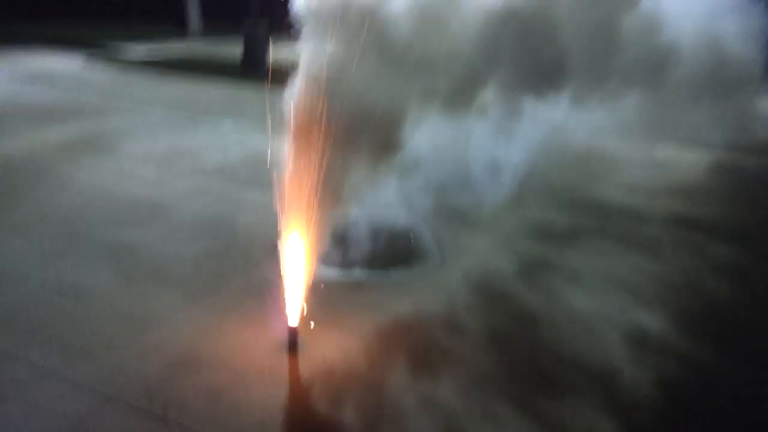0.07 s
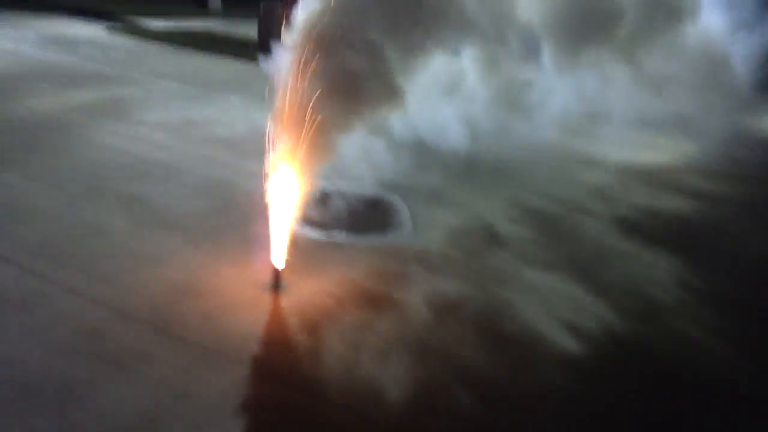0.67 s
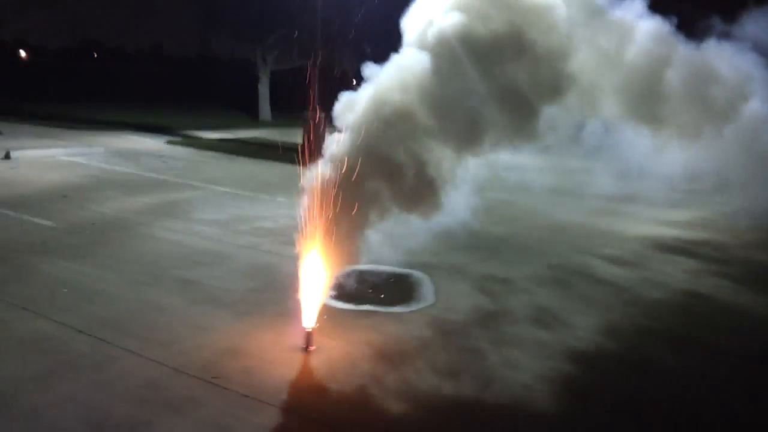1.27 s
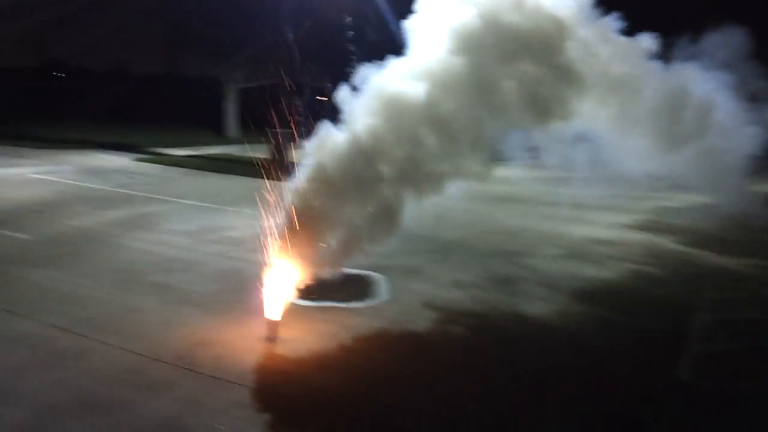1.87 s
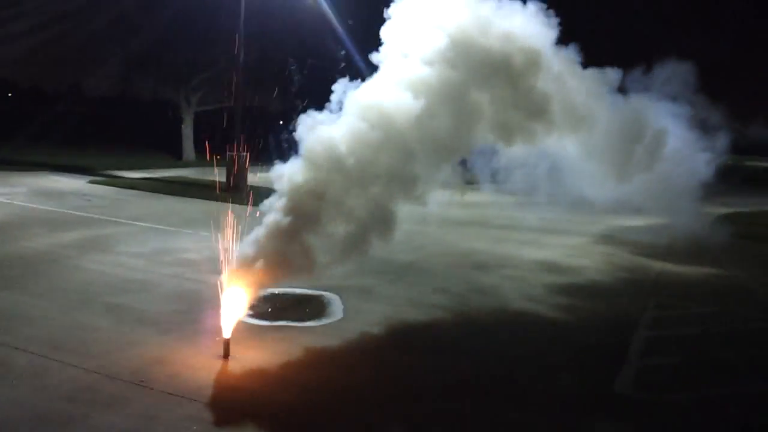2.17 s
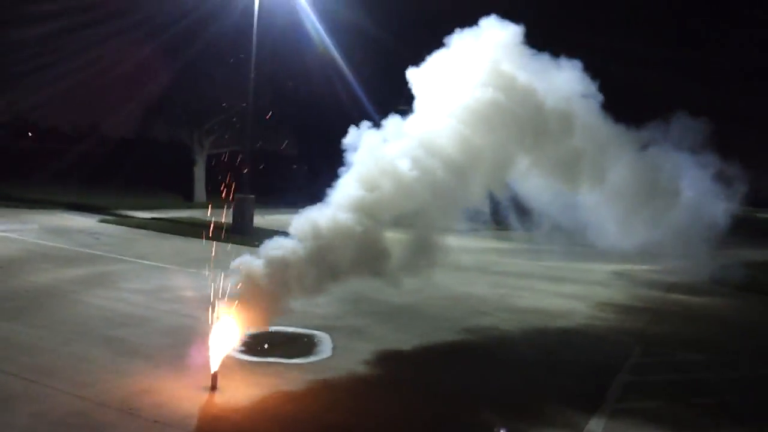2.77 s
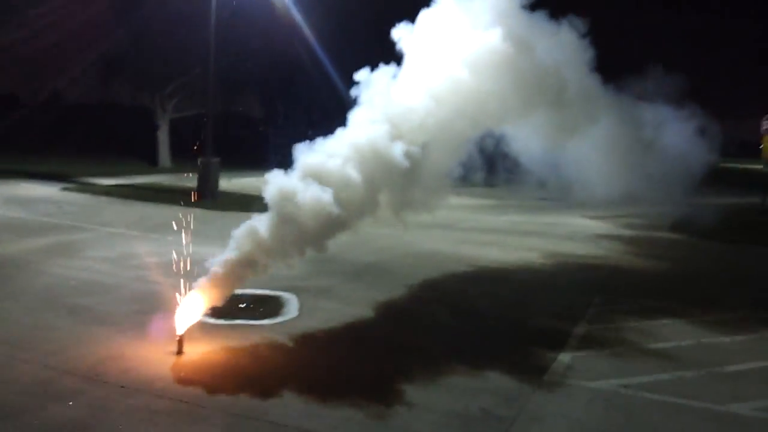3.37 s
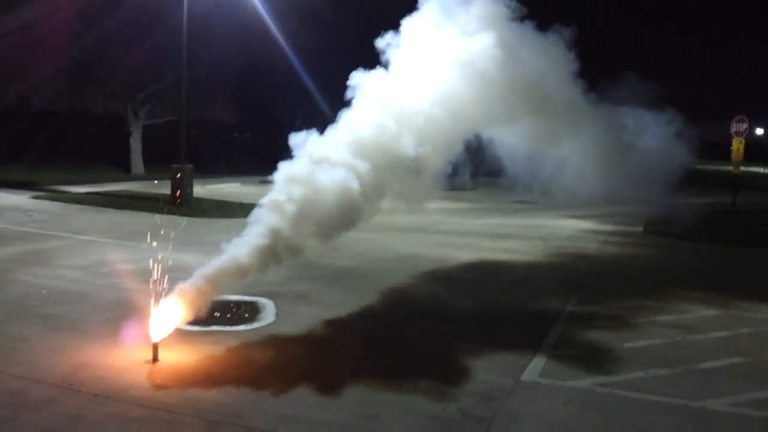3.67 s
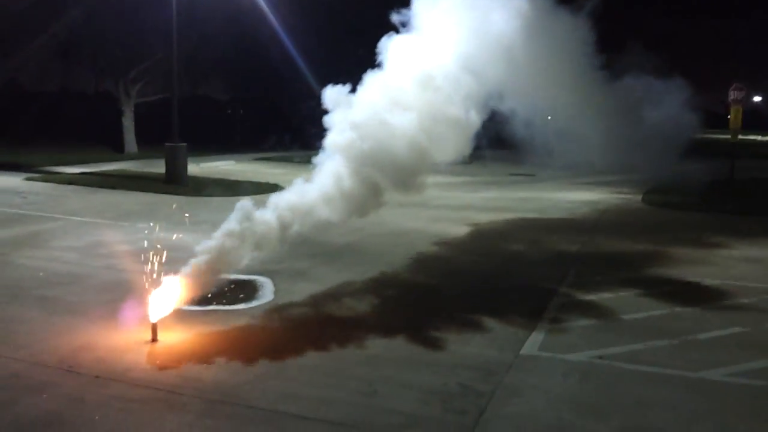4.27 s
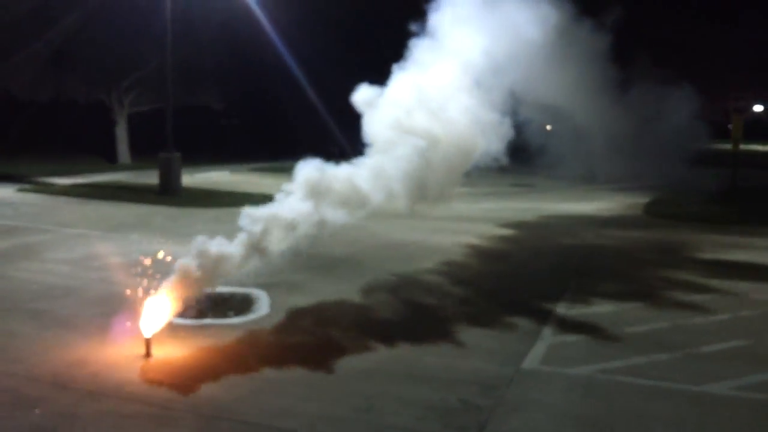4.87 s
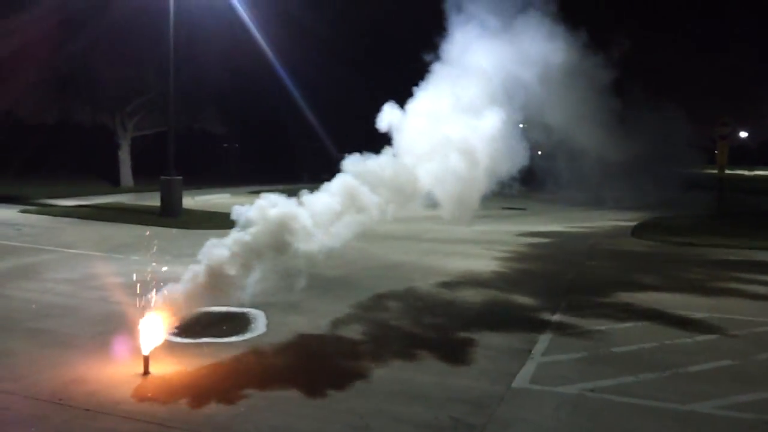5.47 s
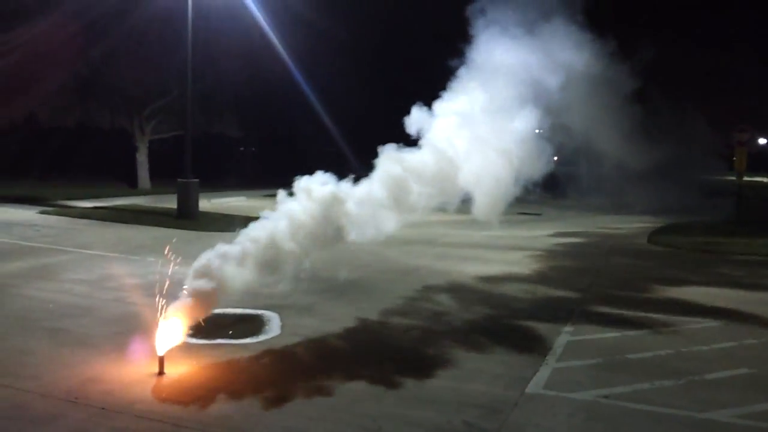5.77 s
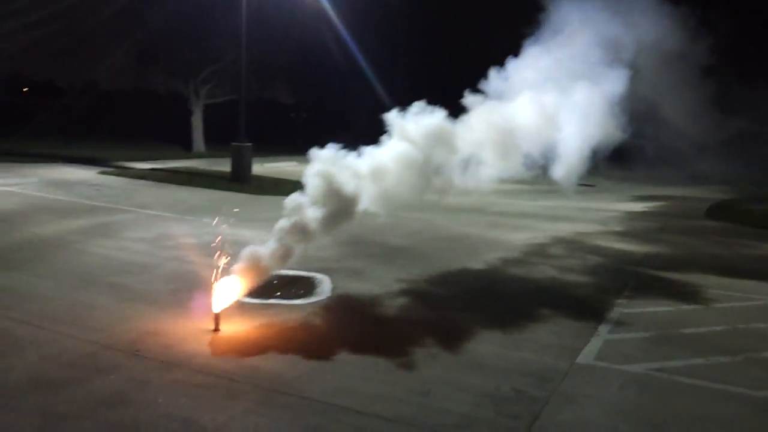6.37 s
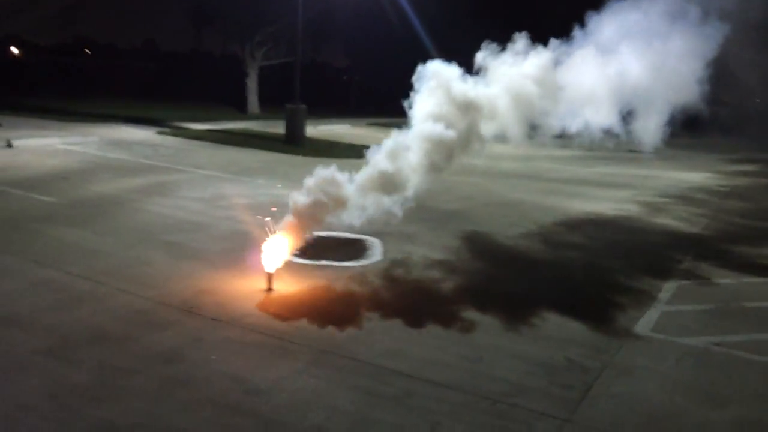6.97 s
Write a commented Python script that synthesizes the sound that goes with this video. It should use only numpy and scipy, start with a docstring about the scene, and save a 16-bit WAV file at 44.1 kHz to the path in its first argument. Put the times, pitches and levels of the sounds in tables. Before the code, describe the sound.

A homemade smoke tube roars and hisses outdoors, then fades to a sizzle with faint crackles while wind gusts buffet the microphone.

```python
"""A concrete lot at night: a homemade smoke tube burns upright, a few metres from a hand-held phone.
Its turbulent jet roars and hisses, then sinks to a sizzle in which the emptying tube resonates and
sparks crackle. Bounces off concrete, fingers and hand comb the hiss as the phone moves.
Wind gusts buffet the two microphone ports and overload the right one."""
import sys
import numpy as np
from scipy import signal
from scipy.fft import rfft, irfft
from scipy.io import wavfile
from scipy.ndimage import uniform_filter1d

SR = 44100
rng = np.random.default_rng(int(sys.argv[2]) if len(sys.argv) > 2 else 0)


def dump(signal):
    """Clip the signal to [-1, 1] and save it as 16-bit WAV at the path in sys.argv[1]."""
    limited = np.clip(np.atleast_2d(signal).T, -1, 1)
    pcm = np.round(limited * 32767).astype(np.int16)
    wavfile.write(sys.argv[1], SR, pcm)


N = 318843
TIME = np.arange(N) / SR
HZ = np.maximum(np.arange(N // 2 + 1) * SR / N, 1)
FULL_THRUST_DB = -15

# course of the burn: time_s, thrust_db, hiss_tilt_db_per_octave
BURN = [(0, -13, -0.5), (.35, -13, -2.5), (1.2, -14.5, -2.3), (1.6, -16.5, -1), (2.05, -20.5, -2.5),
        (2.6, -23.5, -2), (3.2, -28.5, -1.9), (3.8, -30.5, 0.3), (5.3, -46, -0.9), (7.23, -37.5, -1)]


def from_db(db):
    """Decibels to gain."""
    return 10 ** (np.asarray(db) / 20)


def unit_rms(x):
    """Scale to rms 1."""
    return x / np.sqrt(np.mean(x ** 2) + 1e-20)


def in_time(rows, at_s=TIME):
    """Value columns of a table, interpolated over time."""
    time_s, *columns = np.transpose(rows)
    return [np.interp(at_s, time_s, column) for column in columns]


def over_hz(points):
    """A curve interpolated over log frequency."""
    hz, value = np.transpose(points)
    return np.interp(np.log(HZ), np.log(hz), value)


def coloured(spectrum):
    """Noise of the given spectrum, rms 1."""
    return unit_rms(irfft(rfft(rng.standard_normal(N)) * from_db(over_hz(spectrum)), N))


def drift(rate_hz):
    """Slow random wander, rms 1."""
    return unit_rms(irfft(rfft(rng.standard_normal(N)) / (1 + (HZ / rate_hz) ** 2), N))


def moving_filter(x, gain, size=1024):
    """Filter by a slowly changing gain(hz, s)."""
    hz, s, frames = signal.stft(x, SR, nperseg=size)
    return signal.istft(frames * gain(hz[:, None], s), SR, nperseg=size)[1][..., :N]


def roar(thrust_db, flutter_db=1.55):
    """Large jet eddies: low, unsteady, alike at both ports."""
    # freq_hz, density_db
    spectrum = [(20, -3.5), (60, 1.5), (110, 2), (230, 1), (310, -4.5), (435, -19.5), (600, -11),
                (800, -10), (1100, -22.5), (1400, -28), (2200, -21.5), (3200, -47.5), (6000, -37.5)]
    return from_db(thrust_db + flutter_db * drift(15)) * coloured(spectrum)


def rush(thrust_db, level_db=-24.0, steepness=1.9, stereo_spread=0.32):
    """Small, fast eddies at full thrust; they fade sooner than the roar."""
    # freq_hz, density_db
    spectrum = [(400, -46), (850, 10), (1100, 7.5), (1450, 5), (2000, 7), (2800, -4), (3400, -15),
                (5300, 6), (6400, -14.5), (7500, -10.5), (9500, -8.5), (11600, -7.5), (13000, -10),
                (15000, -34)]
    eddies = coloured(spectrum) + stereo_spread * coloured(spectrum) * np.array([[1], [-1]])
    return from_db(level_db + steepness * (thrust_db - FULL_THRUST_DB)) * unit_rms(eddies)


def sizzle(grains_per_s=900, spread_db=3.5, grain_share=0.37):
    """Rushing gas plus the ticks of tiny burning grains."""
    sizes = from_db(spread_db * np.minimum(rng.exponential(1, N), 4)) * rng.choice([-1, 1], N)
    gas = rng.standard_normal(N)
    ticks = sizes * (rng.random(N) < grains_per_s / SR)
    return gas + grain_share * unit_rms(ticks)


def hiss_gain(thrust_db, steepness=1.75, flare_decay_s=0.23, fade_db_per_s=0.66):
    """Power sum of the jet, its opening flare and the slowly weakening burning face."""
    jet = from_db(-26.5 + steepness * (thrust_db - FULL_THRUST_DB))
    flare = from_db(-21.5) * np.exp(-TIME / flare_decay_s)
    face = from_db(-31 - fade_db_per_s * TIME)
    return np.sqrt(jet ** 2 + flare ** 2 + face ** 2)


def hiss(thrust_db, sputter_db=0.5, surge_db=0.62, pivot_hz=5000, port_lag_s=0.000326):
    """Fine turbulence at the mouth; its treble reaches the right port later and partly changed."""
    # freq_hz, density_db
    spectrum = [(300, -2.5), (650, 8), (1100, -3), (1700, -6.5), (2300, 1.5), (3500, 0.5), (5200, 9),
                (6400, -2), (8000, -2.5), (10000, 3), (12000, -3.5), (13200, -0.5), (14500, -13)]
    # likeness of the two ports: freq_hz, correlation
    likeness = [(600, .95), (1400, .85), (3000, .8), (7000, .78), (14000, .55)]

    def tilt(hz, s):
        _, db_per_octave = in_time(BURN, s)
        return from_db(db_per_octave * np.log2(np.maximum(hz, 1000) / pivot_hz))

    left, unrelated = rfft(sizzle()), rfft(sizzle())
    correlation = over_hz(likeness)
    treble_lag = np.exp(-2j * np.pi * HZ * port_lag_s * (HZ > 3200))
    right = correlation * left * treble_lag + np.sqrt(1 - correlation ** 2) * unrelated
    pair = unit_rms(irfft(np.array([left, right]) * from_db(over_hz(spectrum)), N))
    flicker = from_db(sputter_db * drift(59) + surge_db * drift(12))
    return moving_filter(pair, tilt) * hiss_gain(thrust_db) * flicker


def tube(stereo_spread=0.24, waver=0.0097, core_db=6.5, core_width_hz=38, skirt_ratio=0.93):
    """Flow excites the open tube's quarter-wave modes; their pitch wavers with the heat."""
    # air column above the burning face: time_s, pitch_hz, level_db, upper_lift_db
    air_column = [(0, 815, -25.5, -8), (1.5, 840, -41, 19), (2.3, 895, -33.5, 8), (3.3, 916, -31, 4.5),
                  (4.5, 900, -31, 0), (5.7, 890, -31.5, -1.5), (6.3, 857, -31.5, -0.5), (6.7, 884, -34, 10),
                  (7.23, 888, -36, 10)]
    # lowest and upper mode: pitch_ratio, width_hz, level_db
    odd_modes = [(1, 180, 3), (3.13, 393, -12.5)]
    heat = 1 + waver * drift(5)

    def resonance(hz, s):
        pitch_hz, _, lift_db = in_time(air_column, s)
        pitch_hz = pitch_hz * np.interp(s, TIME, heat)
        # lowest mode: a sharp core on a broad skirt that leans low
        core = from_db(core_db) / (1 + ((hz - pitch_hz) / core_width_hz) ** 2)
        skirt, upper = [from_db(db) / (1 + ((hz - ratio * pitch_hz * lean) / width_hz) ** 2) ** 2
                        for (ratio, width_hz, db), lean in zip(odd_modes, (skirt_ratio, 1))]
        return core + skirt + from_db(lift_db) * upper

    flow = rng.standard_normal(N) + stereo_spread * rng.standard_normal((2, N))
    _, level_db, _ = in_time(air_column)
    return from_db(level_db) * unit_rms(moving_filter(flow, resonance, size=4096))


def sparks(sputter_gain=0.29):
    """Larger sparks burst: a sharp snap, then milliseconds of sputter."""
    # start_s, peak_db, centre_hz, decay_s, width_octaves
    bursts = [(3.6333, -15.5, 2080, 0.0012, 0.61), (3.909, -15, 7000, 0.0018, 1.2),
              (4.2342, -6, 11500, 0.0012, 1.7), (4.2588, -16, 9000, .0007, 1.4),
              (4.37, -17, 8000, .001, 1.3), (4.788, -19, 8700, 0.0033, 1.2),
              (5.938, -12.5, 12500, 0.0013, 1.5)]
    out, age_s = np.zeros((2, N)), TIME[:SR // 20]
    snap = 2 * (age_s == 0)
    for start_s, peak_db, centre_hz, decay_s, width_octaves in bursts:
        edge_ratio = 2 ** (width_octaves / 2)
        edges_hz = [centre_hz / edge_ratio, min(centre_hz * edge_ratio, 18000)]
        band = signal.butter(2, edges_hz, "band", fs=SR, output="sos")
        sputter = sputter_gain * rng.standard_normal((2, len(age_s))) * np.exp(-age_s / decay_s)
        pop = signal.sosfilt(band, snap + sputter)
        pop /= np.abs(pop).max(axis=1, keepdims=True)
        start = round(start_s * SR)
        out[:, start:start + len(age_s)] += from_db(peak_db) * pop
    return out


def echo(x, path, port_shares, treble_slope, pivot_hz=5000):
    """One close bounce cuts evenly spaced notches that slide with its lag."""
    def comb(hz, s):
        lag_ms, strength = in_time(path, s)
        tilt = (np.maximum(hz, pivot_hz / 2) / pivot_hz) ** treble_slope
        strength = np.minimum(strength * np.array(port_shares)[:, None, None] * tilt, 1)
        bounce = np.exp(-2j * np.pi * hz * lag_ms / 1000)
        return (1 + strength * bounce) / np.sqrt(1 + strength ** 2)

    return moving_filter(x, comb)


def close_echoes(x):
    """Bounces off the concrete, the fingers on the phone's edge and the hand by the right port."""
    # echo paths: time_s, lag_ms, relative_strength
    concrete = [(0.0, 1.32, 0.13), (0.8, 1.17, 0.22), (1.4, 1.47, 0.04), (2.0, 1.74, 0.2),
                (2.8, 1.36, 0.33), (3.6, 1.4, 0.027), (4.2, 1.06, 0.12), (5.8, 0.74, 0), (6.4, 1.3, 0.2),
                (7.23, 1.7, 0.24)]  # lag follows the phone's height and distance
    fingers = [(0.0, 0.25, 0.13), (1.8, 0.3, 0.12), (2.6, 0.27, 0.4), (3.5, 0.25, 0.355), (5.7, 0.25, 0.24),
               (7.23, 0.23, 0.202)]
    hand = [(0.0, 0.71, 0.28), (1.5, 0.66, 0.45), (2.6, 0.71, 0.4), (3.3, 0.65, 0.7), (4.4, 0.636, 0.55),
            (6.2, 0.64, 0.3), (7.23, 0.72, 0.4)]
    x = echo(x, concrete, port_shares=(1.15, 1.2), treble_slope=-0.15, pivot_hz=4000)
    x = echo(x, fingers, port_shares=(1, 0.58), treble_slope=0.16)
    return echo(x, hand, port_shares=(0, 1), treble_slope=-0.44)


def sliding_bands(x):
    """Narrow peaks and dips that shift with each port's angle to the jet."""
    # band tracks: time_s, centre_hz, left_db, right_db
    null = [(0.0, 3120, -10.478, -3.5), (1.8, 2920, -10, 7), (2.7, 2964.51, -14, 0.527),
            (3.7, 3100, -9.333, -5), (4.4, 2958.71, -33, 1), (7.23, 2977.87, -19, -1.5)]
    lower_notch = [(0.0, 3200, -2.227, -9), (2.7, 3700, -3, 2), (3.3, 4133.13, -10, -2),
                   (4.6, 4086.81, -1.462, -6.351), (5.8, 3895.94, 2.651, -7), (6.5, 3930, 5.5, -4.367),
                   (7.23, 3130.4, -4.0, -2.891)]
    whistly_edge = [(0.0, 5466.7, 2, -4), (1.7, 5189.71, 0.5, 0), (2.7, 5000, 0.651, -2), (3.3, 5030, 3, 3),
                    (4.4, 4872.12, -1, 5), (5.8, 4830, -3, 1), (6.6, 4838.59, 3.5, 4), (6.9, 4200, 7.5, 6),
                    (7.23, 4126.89, 4, 3)]
    upper_notch = [(0.0, 6434.14, 5, 2.035), (1.5, 6360.69, -4, -12), (2.8, 5600, 1, -3),
                   (4.0, 5558.81, 2, 2), (5.0, 5400, -4, 3), (5.8, 5711.07, -7.851, 0),
                   (6.5, 5560, -6.583, 5), (7.23, 5240, -6, -6)]
    treble_hollow = [(0.0, 9900, -5, 3), (2.0, 9800, -10, 3), (2.7, 9886.18, -9.405, -5.056),
                     (3.5, 9823.69, -18, -6), (4.5, 9890.1, -18.697, -1.914), (5.6, 9900, -28, -14.377),
                     (6.3, 9760, -12, -6.472), (7.23, 9600, -9.481, 3.125)]
    # track, width_hz
    bands = [(null, 100), (lower_notch, 150), (whistly_edge, 220),
             (upper_notch, 150), (treble_hollow, 440)]

    def gain(hz, s):
        total_db = 0
        for track, width_hz in bands:
            centre_hz, *port_db = in_time(track, s)
            bell = np.exp(-((hz - centre_hz) / width_hz) ** 2)
            total_db = total_db + np.array(port_db)[:, None] * bell
        return from_db(total_db)

    return moving_filter(x, gain)


def port_colour(x):
    """Each microphone port has its own steady peaks and dips."""
    # centre_hz, width_hz, gain_db
    left_port = [(1380.37, 292, 8.5), (2030, 110, 3), (3070, 165, -15), (4360, 1990, 5.5),
                 (5600, 880, -2.5), (7700, 1400, 15.512), (11414.9, 1569.52, 9.5), (12882.3, 558.198, -1)]
    right_port = [(2700, 530, 4.5), (2031.43, 132.282, 2.3), (4600, 180, -9.5), (5960, 170, 2.3),
                  (6980, 500, 8), (9400, 284.493, -11), (11900, 390, 1), (1770.76, 88.569, -6.2),
                  (12800, 413.736, -13)]
    colour_db = [sum(db * np.exp(-((HZ - hz) / width_hz) ** 2) for hz, width_hz, db in port)
                 for port in (left_port, right_port)]
    return irfft(rfft(x) * from_db(colour_db), N)


def wind_strength(attack_s=0.02, release_s=0.033, calm_db=-29, breeze_start_s=2.51, breeze_rise_s=0.092):
    """Wind gain, left and right: gusts rise, hold and fall over a calm, later over a breeze."""
    # start_s, length_s, left_db, right_db
    gusts = [(0.16, 0.045, -31, -13.5), (0.323, 0.14, -23, -9), (0.935, 0.13, -19, -20),
             (1.302, 0.26, -20, -6), (1.618, 0.099, -30, -6), (1.946, 0.16, -22, -15.5),
             (2.647, 0.054, -30, -8), (2.733, 0.049, -30, -4.5), (2.822, 0.12, -16, -6),
             (3.064, 0.06, -16, -8), (3.175, 0.35, -26, -8), (3.606, 0.099, -21.5, -10),
             (3.802, 0.047, -17, -9), (3.95, 0.17, -19, -18), (4.15, 0.1, -23, -7),
             (4.339, 0.047, -11.5, -13), (4.44, 0.036, -25, -7), (4.522, 0.13, -21, -11.5),
             (4.695, 0.042, -23, -9.5), (4.867, 0.092, -16, -10.5), (4.958, 0.075, -16, -10),
             (5.092, 0.05, -16, -11.5), (5.22, 0.094, -23, -7.5), (5.381, 0.13, -21, -10),
             (5.558, 0.058, -29, -5), (5.646, 0.037, -28, -4.5), (5.709, 0.088, -32, -4),
             (5.854, 0.09, -29, -8), (5.987, 0.067, -27, -9), (6.159, 0.2, -36, -9),
             (6.422, 0.055, -24, -12), (6.512, 0.12, -37, -5.5), (6.836, .05, -32, -15),
             (6.933, 0.09, -38, -9.5), (7.055, 0.042, -36, -13), (7.202, 0.097, -29, -5.5)]
    breeze = from_db([[-24.5], [-15]]) * np.clip((TIME - breeze_start_s) / breeze_rise_s, 0, 1)
    power = from_db(calm_db) ** 2 + breeze ** 2
    for start_s, length_s, left_db, right_db in gusts:
        rise = (TIME - start_s) / attack_s
        fall = 1 - (TIME - start_s - length_s) / release_s
        envelope = np.clip(np.minimum(rise, fall), 0, 1)
        power += (from_db([[left_db], [right_db]]) * envelope) ** 2
    return np.sqrt(power)


def wind(strength, puff_db=6.5, shed_db=-17):
    """Lumpy pressure at one port; its strongest swings shed small, brighter eddies."""
    # freq_hz, density_db
    lump_spectrum = [(10, -19), (28, 0), (70, 0), (110, -5.5), (170, -12), (280, -21.5), (500, -40),
                     (1000, -47), (3000, -56.5)]
    eddy_spectrum = [(40, -40), (130, 24), (300, -5), (550, -8), (1000, -45), (1600, -36), (3000, -55)]
    lumps = coloured(lump_spectrum) * from_db(puff_db * drift(12.5))
    local_rms = np.sqrt(uniform_filter1d(lumps ** 2, size=3000))
    pressure = lumps / local_rms * strength
    swing_power = uniform_filter1d(pressure ** 2, size=300)
    return pressure + from_db(shed_db) * swing_power * coloured(eddy_spectrum)


def buffets(slap_gain=0.85, low_hz=105, typical_top_hz=620, typical_decay_s=0.0084):
    """The fastest eddies slap the port with a steep pressure drop, then flutter away."""
    # start_s, level_db, decay_s
    eddies = [(1.519, 0, 0.025), (2.68, -9.5, 0.0092), (2.765, -9, 0.0096), (2.851, -5, 0.01),
              (2.869, -13, 0.007), (2.901, -18, 0.007), (3.096, -9, 0.01), (3.44, -11, 0.0044),
              (3.491, -16, 0.0093), (3.612, -11, 0.0064), (3.648, -12, 0.014), (3.774, -12, 0.011),
              (4.035, -13.5, 0.0067), (4.055, -9, 0.015), (4.199, -11, 0.0087), (4.38, -13, 0.02),
              (4.526, -12, 0.011), (4.566, -3.5, 0.0048), (4.881, -15, 0.012), (4.913, -5, 0.012),
              (4.976, -8, 0.01), (5.0071, -5, 0.0087), (5.017, -5, 0.005), (5.246, -5.5, 0.0035),
              (5.385, -9.5, 0.012), (5.593, -12, 0.0088), (5.668, -11, 0.023), (5.717, -14, 0.0083),
              (5.734, -2.5, 0.019), (6.558, -10, 0.027), (6.585, -7.5, 0.0078), (6.99, -15, 0.016),
              (7.016, -16, 0.01)]
    out, age_s = np.zeros(N), TIME[:SR // 6]
    for start_s, level_db, decay_s in eddies:
        top_hz = typical_top_hz * (typical_decay_s / decay_s) ** 0.55  # shorter is brighter
        band = signal.butter(2, [low_hz, top_hz], "band", fs=SR, output="sos")
        envelope = np.exp(-age_s / decay_s)
        flutter = unit_rms(signal.sosfilt(band, rng.standard_normal(len(age_s) + 1000))[1000:])
        drop = signal.sosfilt(band, -envelope)
        burst = flutter * envelope + slap_gain * drop / np.abs(drop).max()
        lowpass = signal.butter(3, top_hz * 0.8, fs=SR, output="sos")
        start = round(start_s * SR)
        out[start:start + len(age_s)] += from_db(level_db) * signal.sosfilt(lowpass, burst)
    return out


def eddy_cracks(pressure, width_s=0.0037):
    """An eddy breaks away and sweeps other swirls aside; pressure flips from push to pull."""
    # centre_s, level_db, drop_ms
    cracks = [(1.4341, -1, .38), (1.4429, -1, .38), (1.5271, 5, .33), (2.772, -1, 0.3), (2.8653, 2, .3),
              (4.2062, 2, 0.42), (4.5707, -0.5, 0.37), (5.0081, 1.5, 0.31), (5.0161, -1.5, 0.24),
              (5.238, -2.5, .34), (5.2433, -2.5, 0.16), (5.6663, 1, 0.23), (5.7374, 2.5, 0.66)]
    out = pressure.copy()
    for centre_s, level_db, drop_ms in cracks:
        centre = round(centre_s * SR)
        span = slice(centre - SR // 50, centre + SR // 50)
        offset_s = TIME[span] - centre_s
        blend = np.exp(-(offset_s / width_s) ** 2)
        flip = -np.tanh(offset_s * 1000 / drop_ms)
        out[span] += blend * (from_db(level_db) * flip - out[span])
    return out


def scene():
    """The burning tube through both ports, wind on each; buffets and cracks on the right only."""
    thrust_db, _ = in_time(BURN)
    jet = close_echoes(hiss(thrust_db) + rush(thrust_db))
    fire = sliding_bands(roar(thrust_db) + tube() + jet) + sparks()
    left_strength, right_strength = wind_strength()
    left_wind = wind(left_strength)
    right_wind = eddy_cracks(wind(right_strength) + buffets())
    return port_colour(fire) + np.array([left_wind, right_wind])


def record(dry):
    """Gusts clip at full scale; a steep low-pass cuts the top."""
    cutoff_hz = 14550
    lowpass = signal.ellip(11, 0.1, 90, cutoff_hz, fs=SR, output="sos")
    return signal.sosfilt(lowpass, np.clip(dry, -1, 1))


dry = scene()
out = record(dry)
dump(out)
```